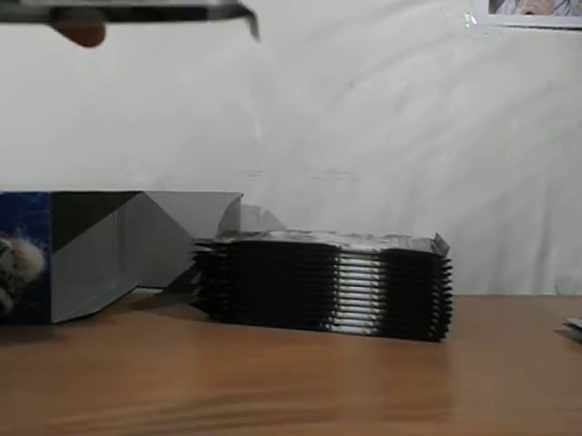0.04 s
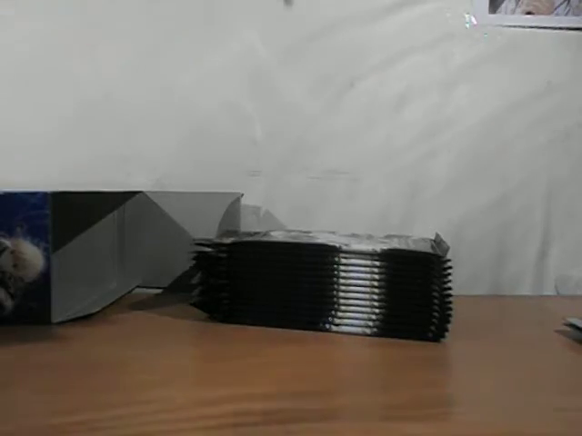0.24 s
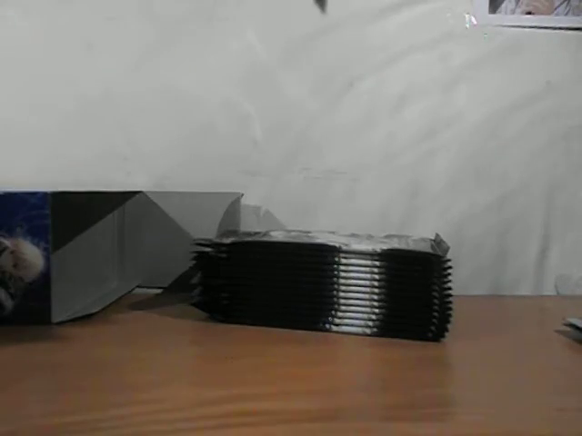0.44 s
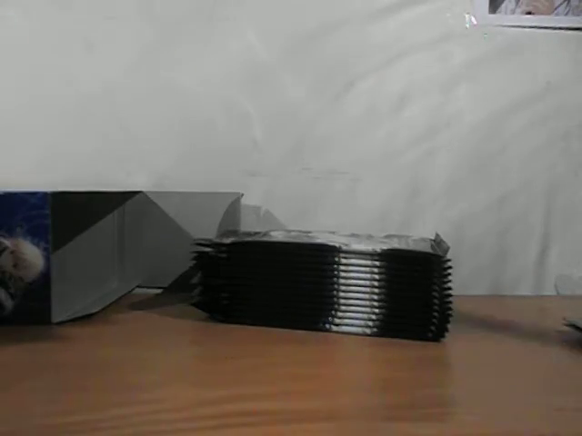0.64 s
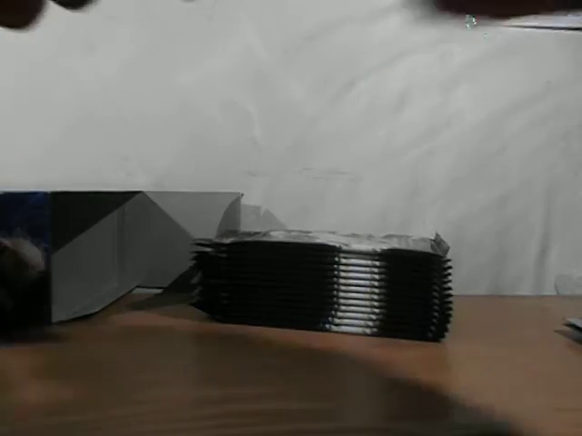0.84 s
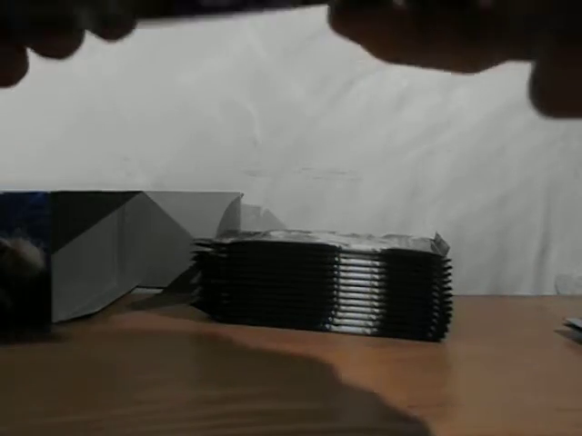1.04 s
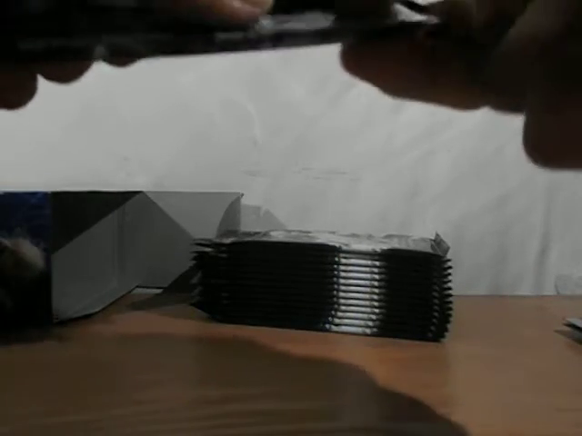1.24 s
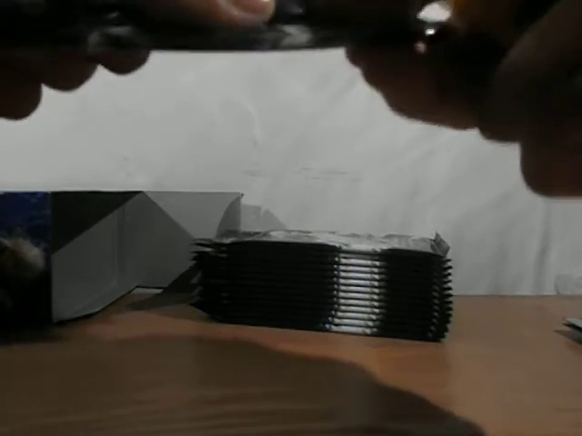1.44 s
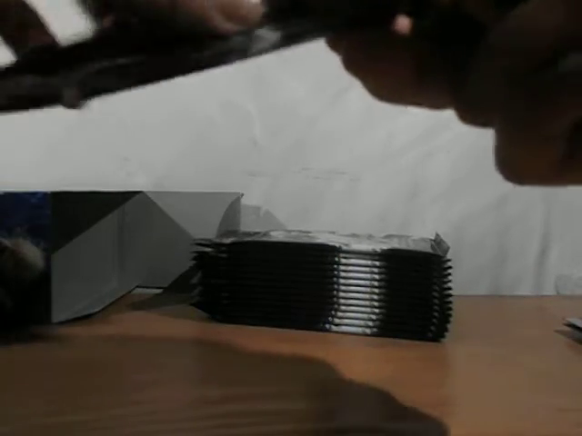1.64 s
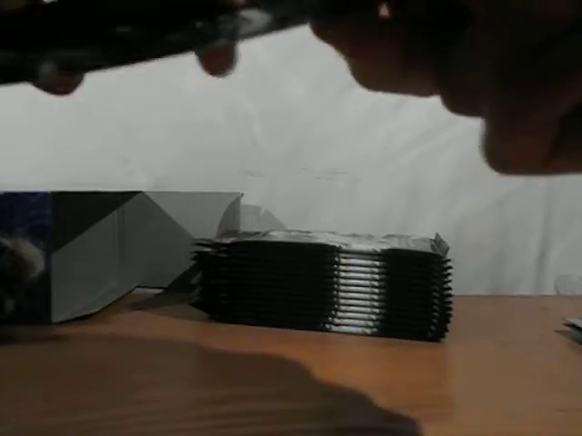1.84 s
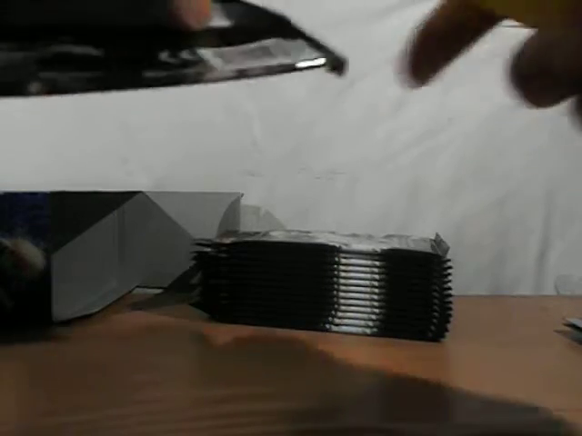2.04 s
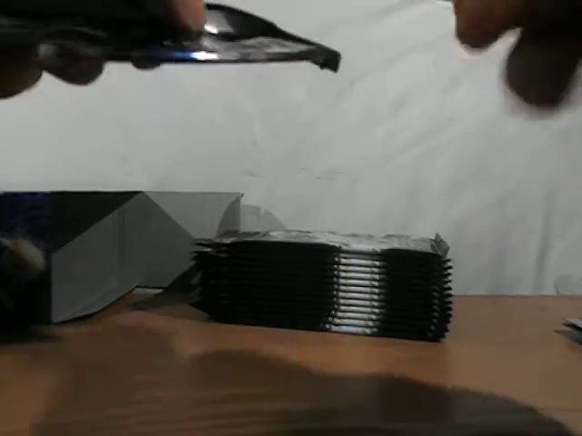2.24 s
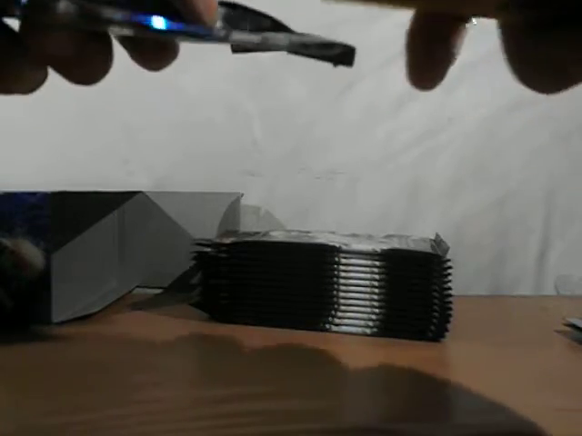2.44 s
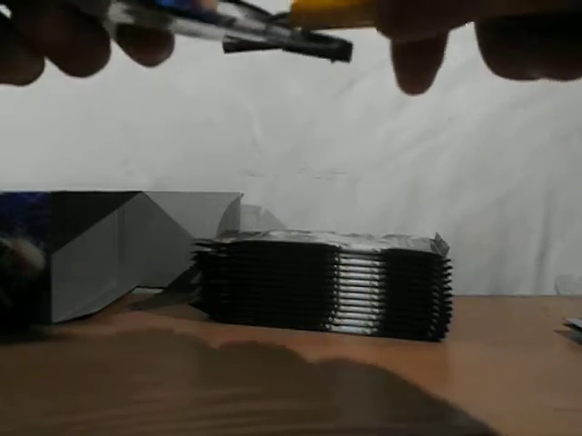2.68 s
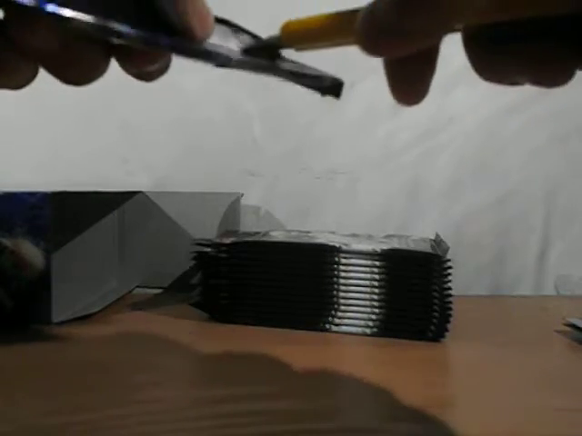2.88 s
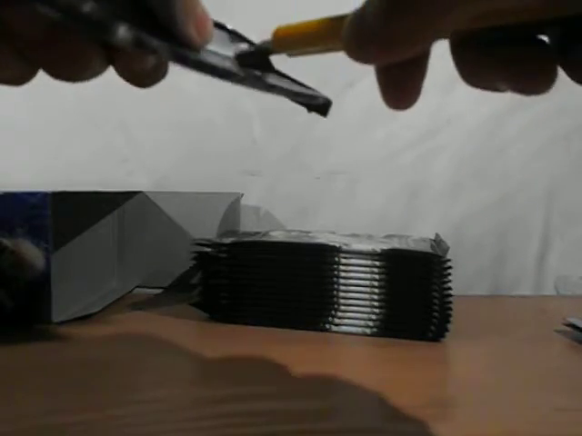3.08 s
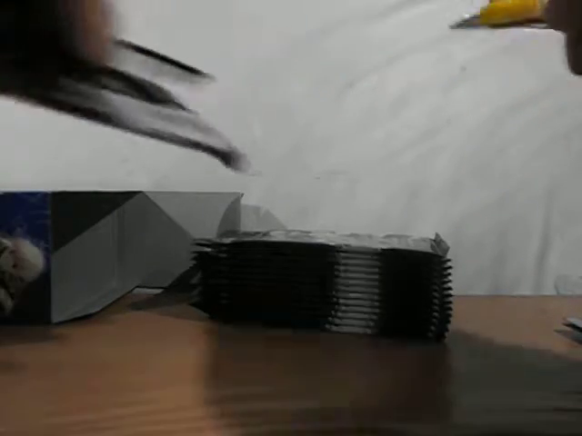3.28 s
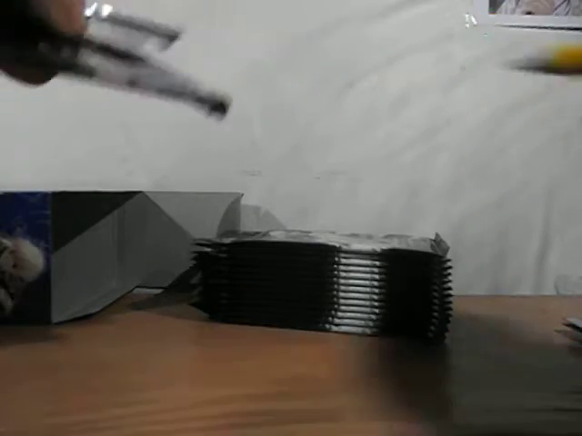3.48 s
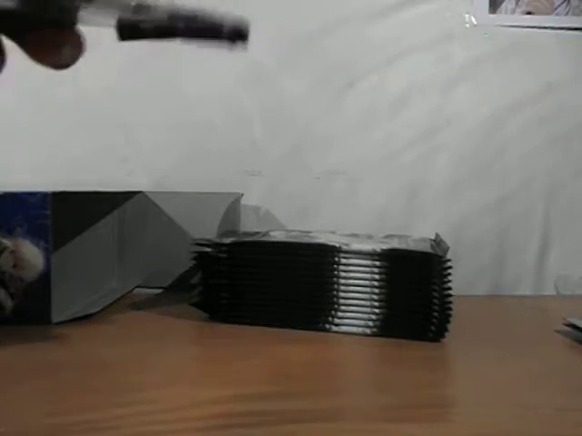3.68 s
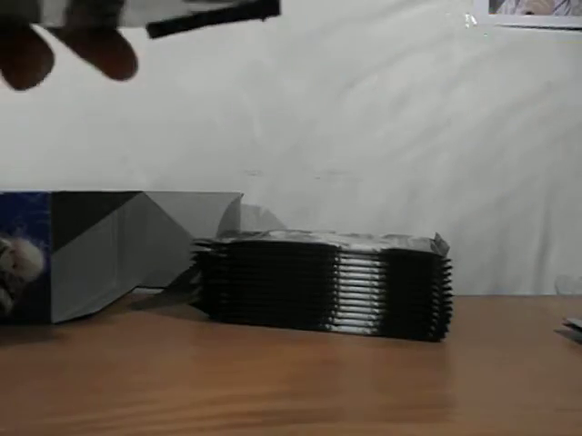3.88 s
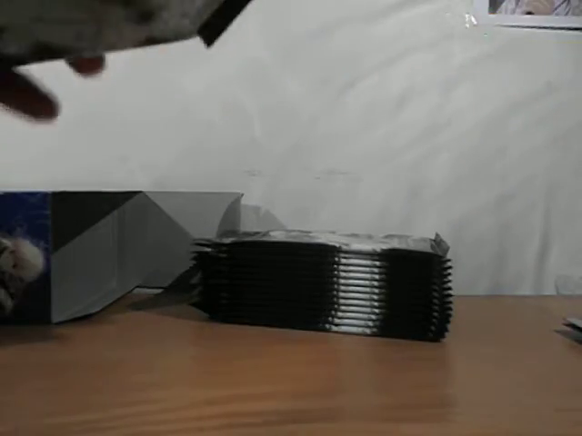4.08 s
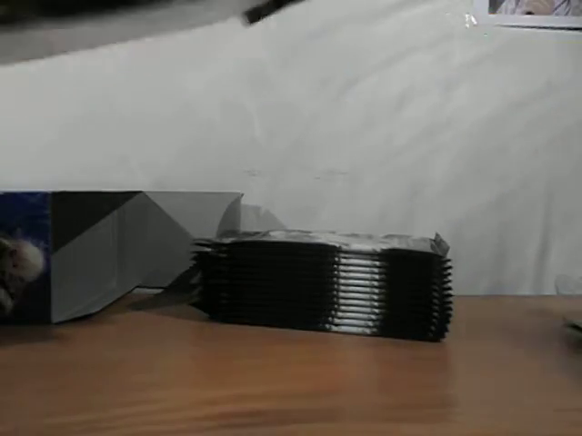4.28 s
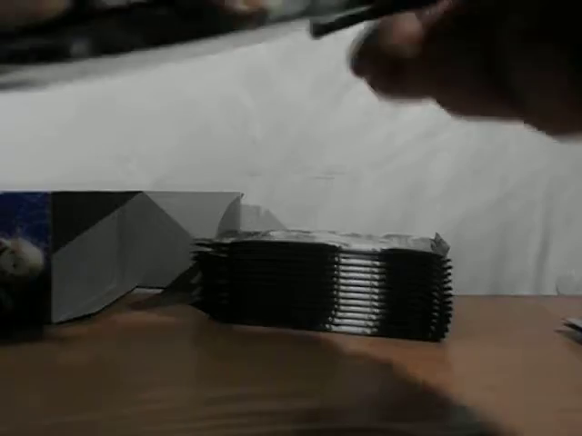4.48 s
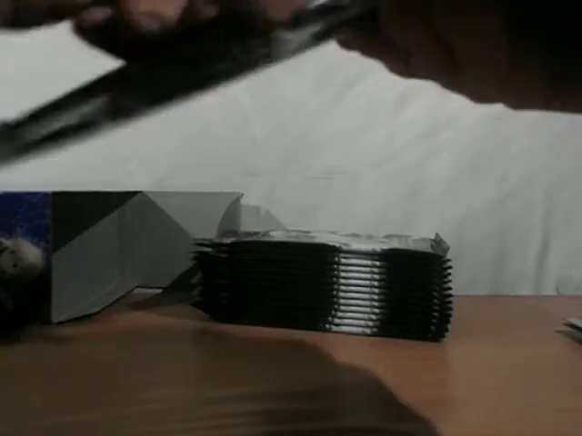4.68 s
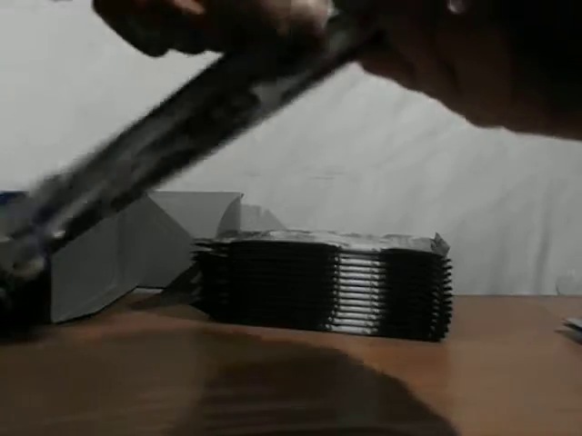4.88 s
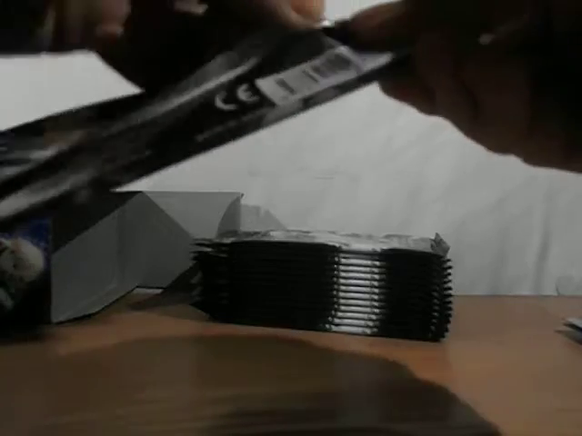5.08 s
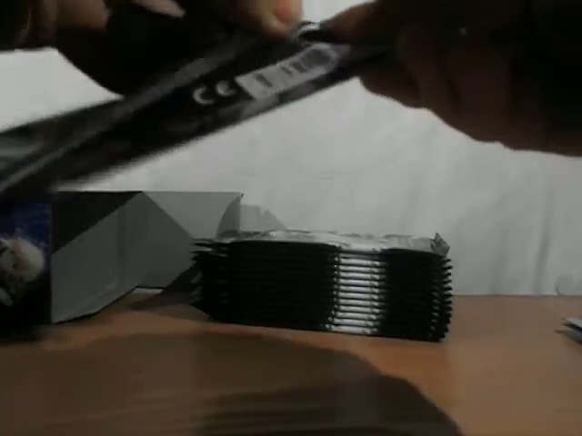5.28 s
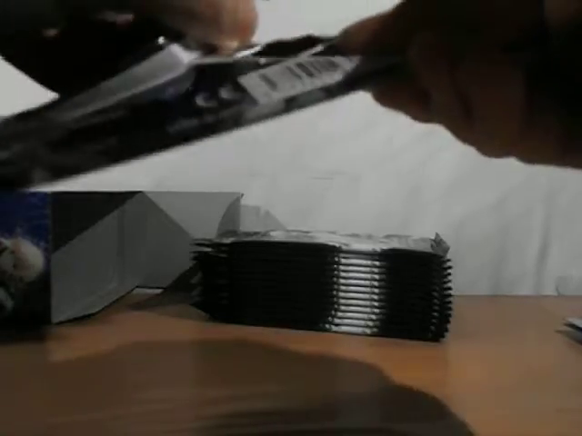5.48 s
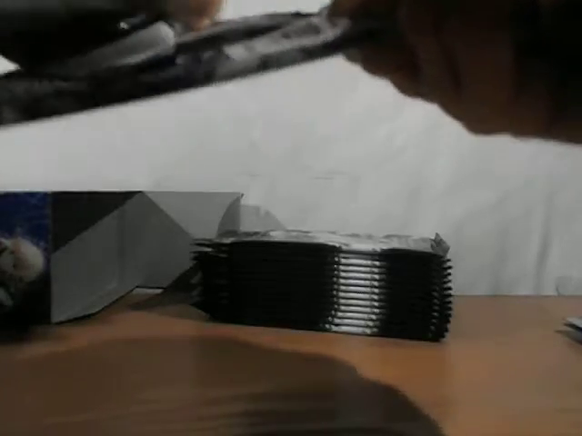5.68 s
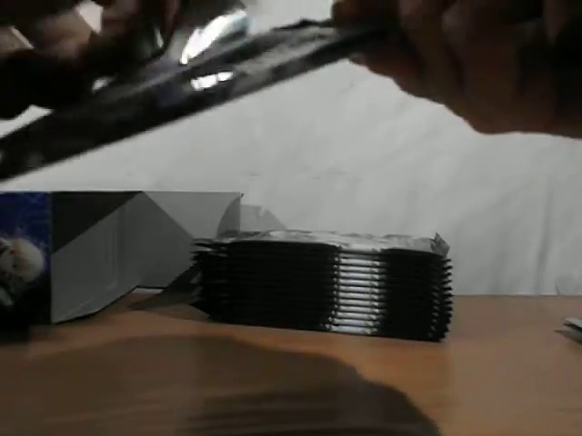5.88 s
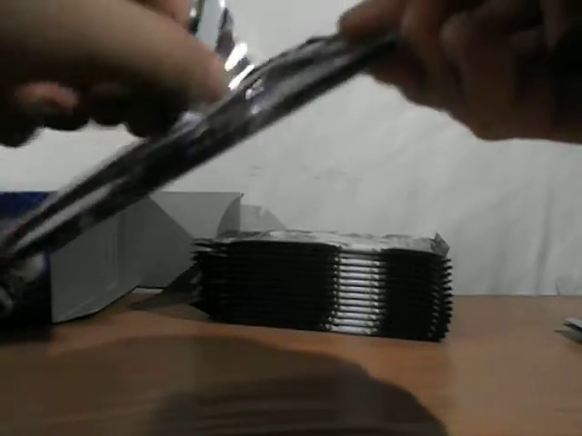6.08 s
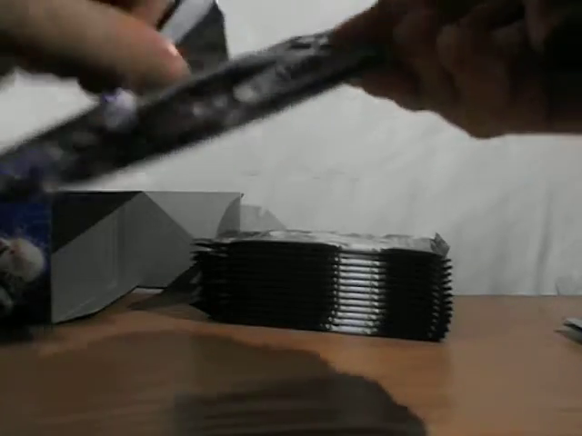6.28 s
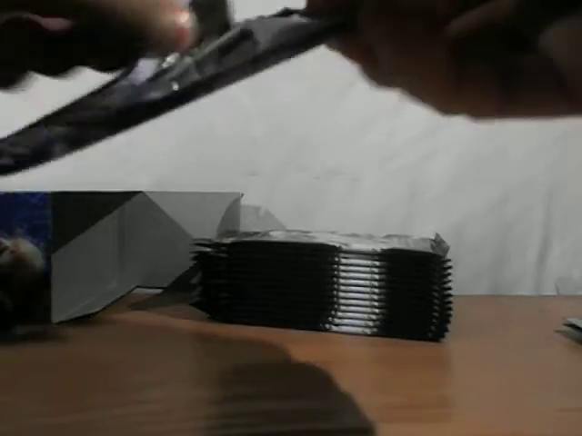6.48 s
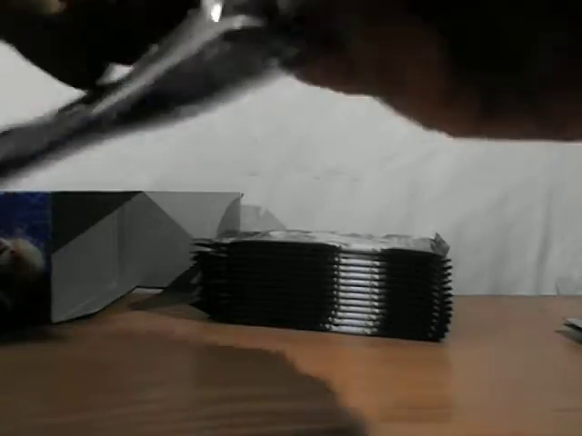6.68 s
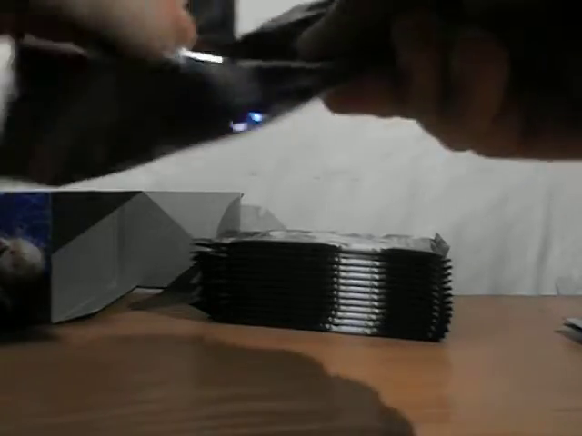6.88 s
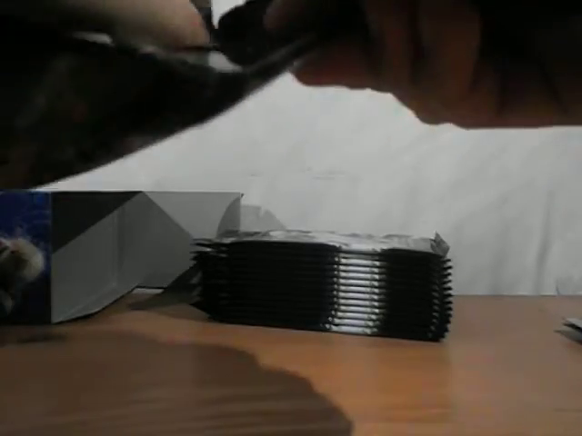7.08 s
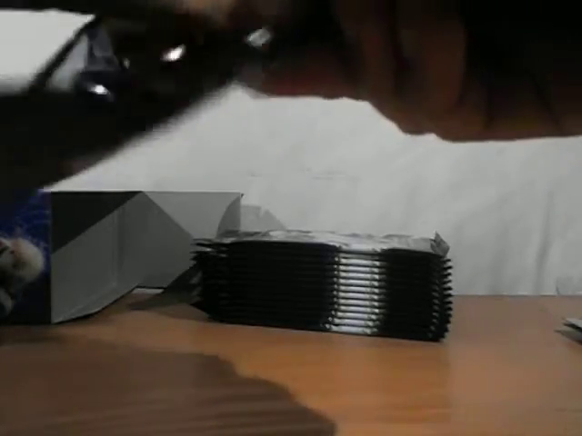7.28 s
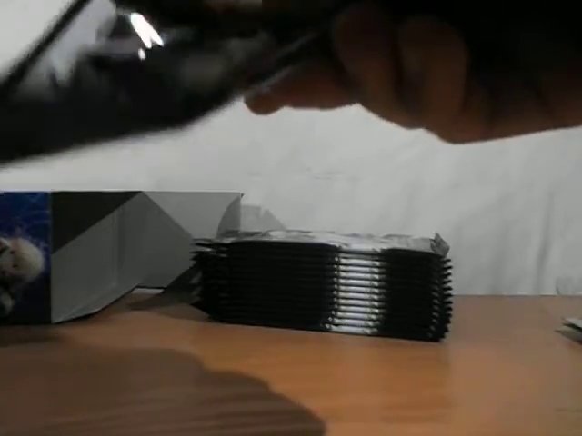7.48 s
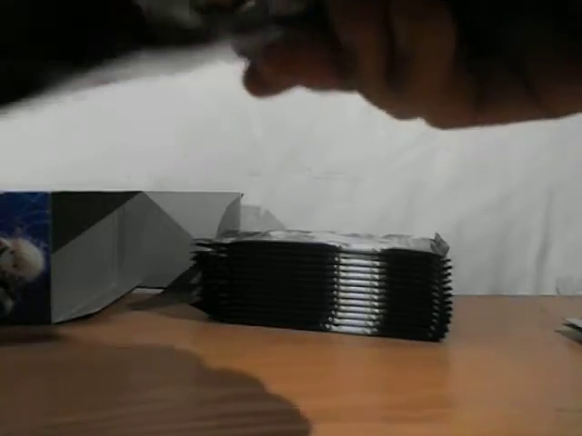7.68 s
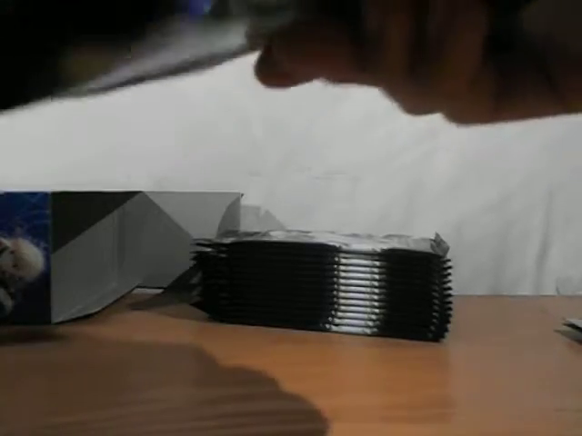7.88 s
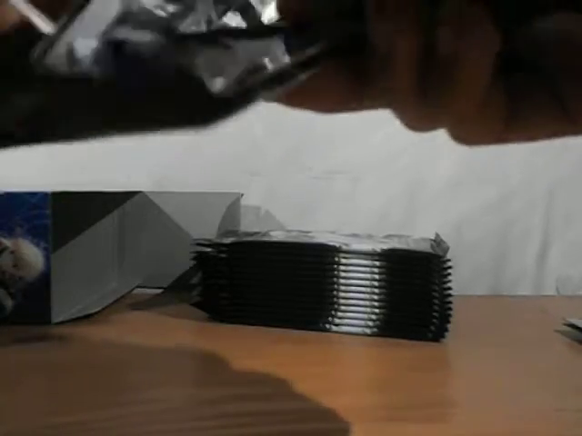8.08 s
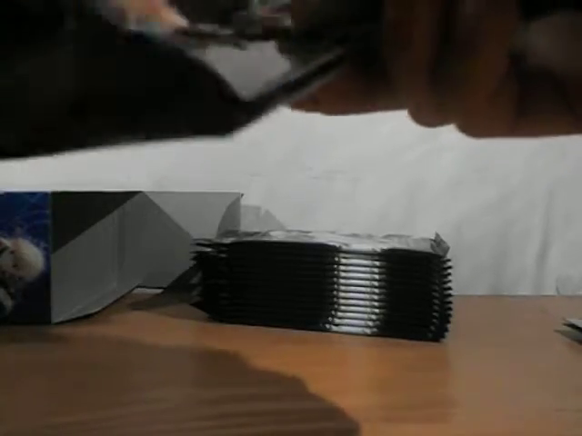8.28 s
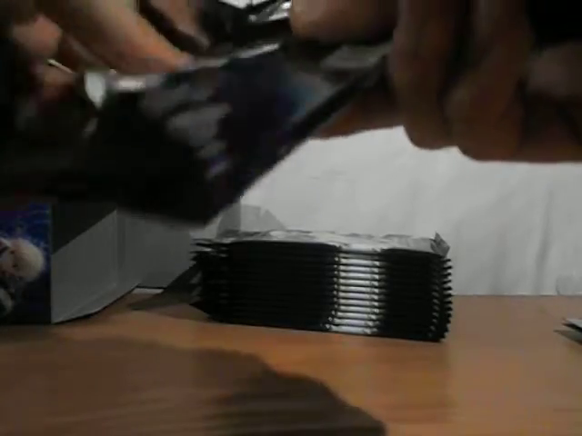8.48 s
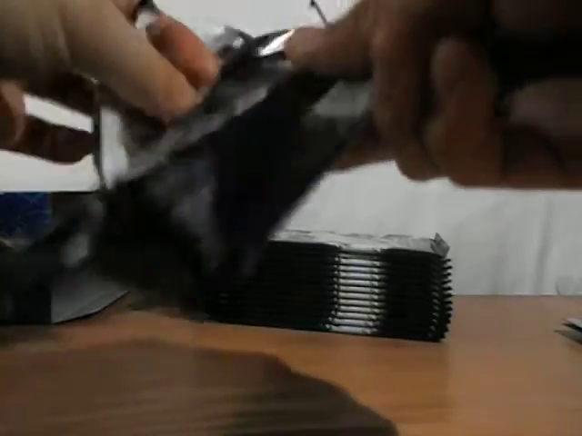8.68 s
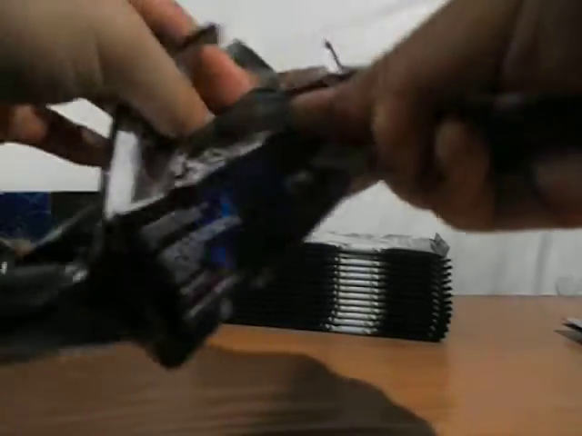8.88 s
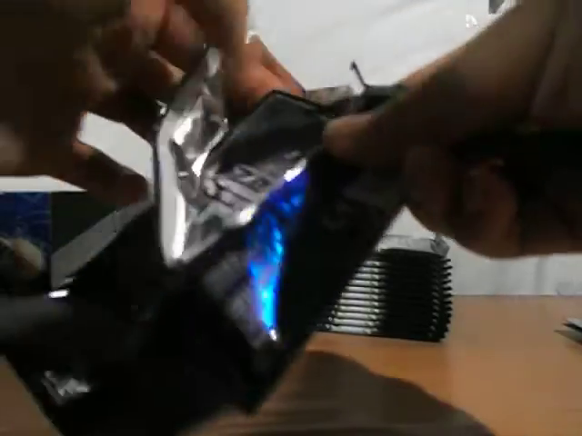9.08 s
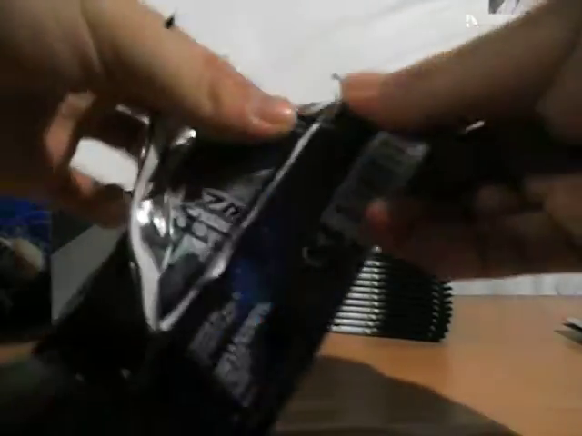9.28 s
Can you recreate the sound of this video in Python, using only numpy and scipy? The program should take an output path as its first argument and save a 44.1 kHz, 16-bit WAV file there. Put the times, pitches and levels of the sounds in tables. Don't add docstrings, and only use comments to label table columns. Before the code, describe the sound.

Close, sharp foil crinkling grows from sparse ticks to dense tearing snaps, with soft table knocks and a low room hum underneath.

```python
import sys
import numpy as np
from scipy import signal
from scipy.fft import rfft, irfft, next_fast_len
from scipy.io import wavfile
from scipy.ndimage import uniform_filter1d

SR = 44100
rng = np.random.default_rng(int(sys.argv[2]) if len(sys.argv) > 2 else 0)


def gain_from_db(level_db):
    decades = np.asarray(level_db, float) / 20
    return 10 ** decades


def output_pcm(signal):
    pcm = np.clip(np.atleast_2d(signal).T, -1, 1) * 32767
    wavfile.write(sys.argv[1], SR, np.round(pcm).astype(np.int16))


N = 411453


def evened(x):
    return x / np.sqrt(np.mean(x ** 2) + 1e-20)


def coloured(x, points):
    points_hz, points_db = np.transpose(points)
    size = next_fast_len(len(x), True)
    hz = np.fft.rfftfreq(size, 1 / SR)
    db = np.interp(np.log(hz + 1), np.log(points_hz + 1), points_db)
    return irfft(rfft(x, size) * gain_from_db(db), size)[:len(x)]


def add(mix, start_s, sound):
    part = mix[round(start_s * SR):][:len(sound)]
    part += sound[:len(part)]


def decay(t, t60_s):
    return gain_from_db(-60 * t / t60_s)


def ring(t, hz, rise_s, t60_s):
    shape = (1 - np.exp(-t / rise_s)) * decay(t, t60_s)
    return shape / shape.max() * np.sin(2 * np.pi * hz * t)


# (frequency [Hz], density [dB per Hz])
HUSH = [(18, 5), (42, 4), (65, -9), (200, -19.5), (360, -31), (700, -28.5), (2000, -29), (5300, -31)]


def hush(noise_db=-40, hum_hz=119, hum_db=-58):
    t = np.arange(N) / SR
    swell_db = 1.5 * evened(uniform_filter1d(rng.standard_normal(N), 6000))
    noise = evened(coloured(rng.standard_normal(N), HUSH)) * gain_from_db(swell_db)
    return gain_from_db(noise_db) * noise + gain_from_db(hum_db) * np.sin(2 * np.pi * hum_hz * t)


# (time [s], peak [dB], pitch [Hz], t60 [s])
SWAYS = [
    (3.153, -23.5, 10.56, 1),
    (7.772, -23.5, 10.7, 0.61),
]


def sways():
    out, t = np.zeros(N), np.arange(SR // 2) / SR
    for s, db, hz, t60_s in SWAYS:
        add(out, s, gain_from_db(db) * ring(t, hz, .0059, t60_s))
    return out


# (time [s], peak [dB], pitch [Hz], t60 [s])
KNOCKS = [(0.0012, -41, 164, 0.11), (4.24, -38.5, 150, 0.1), (3.154, -33.5, 187, 0.16),
          (6.153, -30, 180, 0.14), (4.795, -38.5, 170, 0.09), (4.147, -17, 145, 0.17),
          (4.525, -27.5, 125, 0.17), (4.559, -20.5, 140, 0.14), (4.578, -27, 132, 0.22),
          (4.54, -32, 157, 0.19), (5.277, -28, 63.1, 0.26), (6.1, -27, 89.6, 0.26),
          (6.627, -22.5, 67, 0.14), (9.163, -30.5, 67.4, 0.57)]


def knocks():
    out, t = np.zeros(N), np.arange(SR // 2) / SR
    buzz_colour = [(90, -9.0), (250, -4.5), (600, -11.0), (1500, -34.0)]
    for s, db, hz, t60_s in KNOCKS:
        low = ring(t, hz, .002, t60_s)
        overtone = ring(t, hz * 1.582, .0065, t60_s * .64)
        rough = evened(coloured(rng.standard_normal(len(t)), buzz_colour))
        buzz = rough * ring(t, hz / 4, .0042, t60_s)
        add(out, s, gain_from_db(db - 3) * (low + .6 * overtone + .38 * buzz))
    return out


def facets(x, patchy_db=3.0):
    z = signal.stft(x, nperseg=256)[2]
    patches = uniform_filter1d(rng.standard_normal(z.shape), size=5, axis=0)
    patches = uniform_filter1d(patches, size=14, axis=1)
    return signal.istft(z * gain_from_db(patchy_db * evened(patches) - 1), nperseg=256)[1][:N]


# (frequency [Hz], level [dB])
FOIL = [(300, -15), (1800, -14), (2600, -5), (3500, -3), (4300, -2.5), (5200, -10)]
# (frequency [Hz], level [dB])
BODY = [(150, 3), (370, -11), (600, -4.5), (1100, 1.5), (1800, -2.5), (3000, -19)]
# (time [s], level [dB])
STIR = [(0, -48), (.8, -57), (1.7, -43.5), (2.5, -54), (3.45, -46.5), (3.7, -52), (4.4, -50), (4.85, -44),
        (5.4, -47.5), (6.3, -47.5), (6.55, -36), (6.95, -41), (7.3, -40.5), (7.6, -46.5), (7.95, -39.5),
        (8.76, -41), (8.86, -42.5), (9.33, -38.5)]
# (start [s], end [s], level [dB])
CRUMPLES = [(0.862, 0.911, -35), (1.241, 1.298, -38.5), (1.445, 1.64, -37.5), (1.862, 1.924, -39),
            (2.8, 2.913, -38), (3.038, 3.044, -40), (3.14, 3.189, -27), (3.454, 3.512, -40),
            (3.502, 3.55, -30.5), (4.129, 4.187, -27), (4.617, 4.685, -33.5), (5.252, 5.365, -29.5),
            (5.745, 5.927, -41), (5.998, 6.097, -35), (6.121, 6.185, -27), (6.481, 6.527, -33.5),
            (6.548, 6.661, -32.5), (6.664, 6.749, -30), (6.731, 6.777, -23.5), (6.982, 7.14, -27),
            (7.187, 7.28, -34), (7.319, 7.422, -40), (7.52, 7.603, -29.5), (7.72, 7.785, -21),
            (8.118, 8.148, -36.5), (8.238, 8.298, -32), (8.365, 8.407, -44), (8.516, 8.623, -49),
            (8.936, 9.04, -33), (9.158, 9.188, -23),
            (1.63, 1.668, -29),
]


def rustle(per_s=550, spread_db=5.5, body_db=-9, wake_db=-22, wake_t60_s=.036):
    t = np.arange(N) / SR
    level = gain_from_db(np.interp(t, *np.transpose(STIR)))
    firm = (level / gain_from_db(-38.5)) ** .4
    for start, end, db in CRUMPLES:
        length = max(round((end - start) * SR), 9)
        add(level, start, gain_from_db(db) * signal.windows.tukey(length, .6))
    wake = gain_from_db(wake_db) * decay(t[:SR // 10], wake_t60_s)
    for s, db, *rest in SNAPS + small_creases():
        add(level, s, gain_from_db(db) * wake)

    clicks = gain_from_db(spread_db * np.minimum(rng.exponential(1, N), 4)) * (rng.random(N) < per_s / SR)
    grains = signal.oaconvolve(clicks, decay(t[:600], .0076))[:N]
    grains /= np.sqrt(uniform_filter1d(grains ** 2, 1500) + .5)
    grains = (evened(grains) + .3) ** np.clip(1 - level / gain_from_db(-15), .3, 1)
    grains = level * grains * rng.standard_normal(N)

    unit = rng.standard_normal(N)
    foil = coloured(grains, FOIL) / np.std(coloured(unit, FOIL))
    body = coloured(firm * grains, BODY) / np.std(coloured(unit, BODY))
    return facets(foil + gain_from_db(body_db) * body)


def snap(db, hz, body_db, chance):
    t = np.arange(1024) / SR
    second_hz = hz * 1.25 ** np.clip(chance[0, 0], -1, 1)
    crack = ring(t, hz, .0007, .003) + .8 * ring(t, second_hz, .0002, .0022)
    crack += .36 * ring(t, 4810, .00022, .0025)
    rattle = evened(coloured(chance[1], FOIL)) * (1 - np.exp(-t / .0015)) * decay(t, .016)
    thud = evened(coloured(chance[2], BODY)) * (1 - np.exp(-t / .0004)) * decay(t, .014)
    sound = crack + gain_from_db(-4.5) * rattle + gain_from_db(body_db + 1.5) * thud
    return gain_from_db(db) * sound / abs(sound).max()


# (start [s], end [s], first rate [slips/s], last rate [slips/s], peak [dB], ring pitch [Hz])
PEELS = [
    (6.776, 6.798, 400, 180, -9, 3340),
    (6.843, 6.882, 190, 480, -2, 3190),
]


def peels():
    out = np.zeros(N)
    for start, end, first, last, db, hz in PEELS:
        t = np.arange(start, end, 1 / SR)
        slip_count = np.cumsum(np.linspace(first, last, len(t))) / SR + 1.1
        for i in np.flatnonzero(np.diff(np.floor(slip_count))):
            chance = rng.standard_normal((3, 1024))
            add(out, t[i], snap(min(db + chance[0, 1], -6), hz, -19, chance))
    return out


# (time [s], peak [dB], ring pitch [Hz])
TICKS = [(0.0942, -17.5, 3700), (0.196, -15.5, 3250), (0.2884, -22.5, 4000), (0.311, -24.5, 3220),
         (1.0559, -14.5, 2700), (1.0805, -24.5, 1160.0), (1.2533, -19, 3230), (1.3255, -12, 2100),
         (1.41, -23, 4080), (1.4242, -21, 3570.0), (1.5072, -14, 3490.0), (1.595, -13.5, 2540.0),
         (1.6057, -13.5, 3470), (1.6184, -19.5, 950.0), (1.6443, -21, 3250), (1.6784, -14.0, 5060),
         (1.7197, -20.5, 3240), (1.7273, -19, 4230), (1.774, -18.5, 3400), (1.8237, -14, 4120),
         (1.8852, -19, 3360.0), (1.8982, -25, 3570.0), (1.9038, -31, 3260), (1.9113, -25, 3470),
         (2.0028, -14, 4770), (2.0293, -13.5, 3900), (2.0402, -18, 3380), (2.1169, -13.5, 3850),
         (2.1329, -25, 4090.0), (2.1434, -23, 3100), (2.395, -15.5, 3530), (2.4254, -20, 3840),
         (2.7518, -24.0, 3700), (2.7814, -20.5, 3960.0), (2.837, -20, 2450.0), (2.8658, -13, 2720),
              (2.8975, -11, 5150), (2.9008, -18.0, 3700.0), (2.9444, -11, 5100), (3.018, -13.5, 2460),
              (3.1224, -12.5, 4700), (3.14, -16, 4180.0), (3.2162, -14, 3500), (3.3017, -19.5, 3470),
              (3.3533, -10, 4240), (3.3905, -20.5, 2300), (3.5259, -14, 3250), (3.5294, -17, 3530.0),
              (3.7305, -17.0, 4070), (3.7794, -20, 4130.0), (3.8488, -23.5, 3660), (4.0222, -17, 4000),
              (4.1142, -22.5, 3650), (4.1204, -27, 2930.0), (4.1699, -17.0, 4740.0), (4.3512, -12, 3180),
              (4.479, -21, 4000), (4.5319, -13, 4310.0), (4.621, -15.0, 3340), (4.6602, -14.0, 3190.0),
              (4.6675, -19, 3080), (4.6903, -20, 3490.0), (4.7312, -18.5, 3340), (4.7962, -15, 4010.0),
              (4.8519, -16, 3530.0), (4.8912, -18.5, 3490.0), (5.1494, -16, 4160), (5.158, -21, 3260),
              (5.2526, -18, 3730), (5.2682, -18, 3230.0), (5.306, -9, 4600), (5.3214, -13, 3300),
              (5.3515, -19, 4520.0), (5.369, -24, 3700.0), (5.4711, -21.5, 2960), (5.5717, -22.5, 2800.0),
              (5.6423, -15.5, 3500), (5.6709, -18.5, 3620), (5.715, -25, 3300), (5.745, -21, 3490.0),
              (5.7777, -20, 3270.0), (5.7944, -13, 3100), (5.8516, -25, 3450.0), (5.8634, -27, 4440),
              (6.0256, -20.0, 3600), (6.0534, -21, 1380.0), (6.0712, -17.0, 3750.0), (6.0781, -20, 3630),
              (6.1387, -13, 3360), (6.1887, -27, 3190.0), (6.2594, -18, 3460), (6.2817, -19, 3960),
         (6.3514, -23.0, 3920.0), (6.3647, -17, 3960.0), (6.397, -14.5, 4820.0), (6.4252, -19, 1550.0),
              (6.437, -14.0, 5040.0), (6.4491, -14, 4350.0), (6.4909, -13, 3360.0), (6.4943, -15, 4260.0),
              (6.5042, -19, 2670.0), (6.548, -18, 3880.0), (6.567, -15, 3360.0), (6.6162, -15, 2930.0),
              (6.623, -14, 2930.0), (6.6445, -10, 3400.0), (6.6596, -15, 4130.0), (6.6672, -18, 1210.0),
              (6.6753, -15.0, 3880.0), (6.6838, -12, 3060.0), (6.7074, -19, 2110.0), (6.7264, -18, 3880.0),
              (6.7585, -24, 3320.0), (7.002, -19.5, 2840.0), (7.0098, -19, 1080.0), (7.0214, -25, 2930.0),
              (7.049, -20, 3530.0), (7.0716, -13, 2710.0), (7.0891, -22, 3360.0), (7.0972, -15, 3140.0),
              (7.1131, -27, 4440.0), (7.176, -21, 860.0), (7.215, -23, 3140.0), (7.2223, -15, 3700.0),
              (7.237, -13, 990.0), (7.2492, -18, 3060.0), (7.3186, -17.5, 2930.0), (7.3273, -18, 2930.0),
              (7.341, -19, 2930.0), (7.3937, -19, 2760.0), (7.4494, -24, 1460.0), (7.4561, -17, 3790.0),
              (7.4593, -24, 3140.0), (7.4778, -17, 3660.0), (7.6085, -20.5, 2970.0),
         (7.7155, -10, 3060.0), (7.801, -14, 4310.0), (7.8588, -15, 3660.0), (7.9065, -16, 1290.0),
                (7.9274, -24, 2840.0), (7.9468, -25, 3060.0), (8.0492, -14, 2760.0), (8.063, -17, 4220.0),
                (8.0938, -27, 3750.0), (8.1436, -26.5, 3140.0), (8.1693, -19, 3620.0),
                (8.185, -17.5, 2330.0), (8.2203, -17, 4010.0), (8.2304, -25, 4740.0), (8.25, -13.5, 1030.0),
                (8.289, -30, 2930.0), (8.5219, -19, 3790.0), (8.5326, -18.0, 2710.0), (8.5427, -15, 3660.0),
                (8.5665, -32, 3010.0), (8.593, -19, 3660.0), (8.6228, -23, 3100.0), (8.632, -12, 3620.0),
                (8.6524, -18.5, 3400.0), (8.6692, -21.5, 3570.0), (8.6953, -23.5, 1120.0),
                (8.7475, -13.5, 3920.0), (8.7494, -18, 2890.0), (8.7803, -14, 2970.0), (8.796, -17, 3490.0),
                (8.8964, -17, 1210.0), (8.957, -14, 1380.0), (9.139, -20.0, 3750.0), (9.1916, -6.5, 3230.0),
                (9.1953, -19, 3320.0)]
# (time [s], peak [dB])
FAINT = [(0.0142, -22), (0.0284, -33), (0.3765, -21.5), (0.4214, -28), (0.6619, -24), (0.6817, -30),
         (0.6916, -18.5), (0.7287, -20.5), (1.289, -27), (1.3887, -27), (1.477, -22), (2.359, -21.5),
         (2.576, -21.5), (2.617, -26.5)]


def small_creases(faint_hz=4280):
    faint = [(s, db, faint_hz) for s, db in FAINT]
    return TICKS + faint


# (time [s], peak [dB], ring pitch
# [Hz], low body against ring [dB])
CREASES = [(0.9704, -11.5, 2150.0, -9), (1.0375, -10.5, 3630, -24), (1.1938, -10.0, 3140, -8),
           (1.5162, -9.5, 3880.0, -12), (1.5223, -4, 3520, -17), (1.5358, -6, 3270.0, -18),
           (1.5394, -4.5, 2460, -14), (1.5571, -8, 5030, -33), (1.6481, -10.5, 2840, -16),
           (1.6509, -6.5, 5140, -12), (1.8273, -10.5, 3580, -9.5), (1.8412, -14, 3480, -22.0),
           (1.8951, -5, 3750.0, -23.0), (1.9625, -6, 3450, -32), (2.1645, -7, 3400, -16.5),
           (2.2032, -7.5, 4500, -22),
           (2.8471, -6, 3970, -38), (2.8906, -11, 3570, -35), (2.9054, -15, 3480, -24),
            (3.0263, -10, 3870, -12), (3.1616, -11, 3370, -13), (3.4055, -9, 4440.0, -32),
            (3.5492, -11.5, 3500, -28), (3.7221, -7, 3730, -48), (3.9154, -12.5, 3930, -6),
            (4.157, 4, 3830.0, -16), (4.1598, -14, 3660.0, -11), (4.503, -3.5, 4260.0, -27.5),
            (4.5086, -10, 4000, 1), (4.5208, -6.5, 3190.0, -33), (4.528, -7, 3540, -38),
            (4.5462, -8, 3790.0, -32.0), (4.6169, -8, 4740.0, -18), (4.627, -14.5, 3140.0, -26),
            (4.6302, -8, 3270.0, -14.5), (4.6488, -8.5, 3600, -33.5), (4.6773, -9.5, 3360, -29),
           (4.8107, -11.5, 3330, -24.0), (4.8635, -9, 3430, -30), (4.9045, -7, 3658, -35),
          (4.9186, -11.5, 2900, -25.0), (4.9247, -9.5, 3440, -29), (4.9432, -7.5, 2130, -16),
          (4.9474, -6, 3250, -17), (4.96, -4.5, 4300, -25), (4.9702, 1.5, 3500, -14),
          (5.0277, -2.5, 4220, -5), (5.0379, -5.5, 3760, -8), (5.056, -9, 4360, -18.5),
          (5.0809, -4, 3750, -39), (5.1002, -5.5, 4080, -14), (5.28, -12.5, 3380, -17),
          (5.2903, -19, 3230.0, -20), (5.2952, -17, 3100.0, -20), (5.3004, -5.5, 3600, -15),
          (5.3145, -6.5, 3530, -29), (5.7554, -5, 3470, -12), (5.7902, -6.5, 4230, -9.5),
          (6.0363, -10.5, 3760, -17), (6.1446, -1, 5020, -18), (6.1542, -6, 3780, -16),
          (6.1583, -6, 3490.0, -5), (6.1832, -6.5, 3400, -29.0),
           (6.4218, -10, 4090.0, -21), (6.4984, -16, 3490.0, -23), (6.5249, -4.5, 3790.0, -27),
           (6.6327, -12.5, 3490.0, -24), (6.6808, -8.0, 3320.0, -11.5), (6.7384, -5, 4700, -21),
           (6.7453, -8, 4090.0, -28), (6.7521, -2.5, 3020, -34.5), (6.7744, -16, 3490.0, -23),
           (6.8355, -9.5, 3100, -32.0), (6.8948, 0, 3360.0, -28), (6.9062, -8, 3130, -41),
           (6.922, -11.5, 3090, -4), (7.054, -6.5, 3230.0, -21), (7.0636, -6.5, 2370.0, -3.5),
           (7.0845, -8.5, 4700, -5), (7.195, -7.0, 3550, -4), (7.2587, 1, 3380, -22),
           (7.27, -4.5, 4080, -7), (7.282, -12.5, 4020, -31), (7.356, -6, 3010.0, 5),
           (7.3607, -12, 2850, -20.0), (7.3685, -9.5, 3190.0, -16), (7.5067, -2.5, 2000, -16.0),
           (7.5137, -2, 3490.0, -15.0), (7.5208, -14.5, 3550, -17), (7.539, -9, 2890.0, -7),
           (7.5417, -6.5, 3800, -29), (7.5511, -7, 4220, -24.5), (7.5735, -16, 2930.0, -18),
           (7.583, -1.5, 3000, -14), (7.59, -9, 2990, -26.5),
           (7.7222, -12, 3720, -27.0), (7.7298, -7, 2960, -21), (7.7321, -2.5, 4770, -20.0),
             (7.7346, 2, 2950, -9), (7.7394, 8.5, 3200, -17.0), (7.7605, -5.5, 4180.0, -17),
             (7.7784, -10.5, 2840.0, -7), (7.807, -9.5, 3320.0, -13), (7.8771, -6.5, 3000, -11),
             (7.9644, -6, 2370.0, -26), (7.989, -6, 3280, -17), (8.0192, -7.5, 4100, -14),
             (8.0352, -6.5, 2900, -20), (8.2533, -10.5, 2620, -10), (8.2682, -8.5, 2610, -9),
             (8.3024, -12.5, 2630.0, -26.0), (8.3085, -12, 2450.0, -8), (8.3133, -9.0, 3790.0, -27),
             (8.3447, -5.5, 3270.0, -15), (8.3772, -1, 3660, -14), (8.3993, -5, 3220, -23.0),
             (8.4592, -7.5, 3790.0, -41.0), (8.4686, -19, 3190.0, -33.5), (8.474, -9.5, 4200, -39),
             (8.4787, -19, 3940, -35.0), (8.5013, -5, 4040, -31), (8.505, -18, 3950, -36),
             (8.5875, -8.5, 2930.0, -16), (8.6013, -6.5, 3230.0, -1.5), (8.6056, -7, 3600, -8),
             (8.8882, -4.5, 3530, -18.0), (8.9596, -12.5, 4140, -13), (9.001, -17.5, 3070, -7),
             (9.102, -12.5, 2450, -1), (9.1246, -6.5, 3640, -11.5), (9.1513, -17, 3100.0, -1),
             (9.1631, -5, 3860, -17), (9.1723, -4, 3600, -15), (9.1758, -13, 3060.0, -19.0),
             (9.1874, -12, 3640, -27), (9.2064, -8, 3830.0, -19), (9.2434, -8.5, 3600, -22),
             (9.2481, -5, 3800, -9.5), (9.254, -8.5, 3750, -7.5), (9.3173, -9.5, 3860, 1)]
SNAPS = CREASES
# (time [s], peak [dB], ring pitch [Hz], body [dB])
CRACKS = [(1.5697, -1.4, 3320.0, -22), (2.9185, 0.2, 3400.0, -21), (2.9558, -1.6, 3320.0, -26),
          (2.9755, 0.3, 3790.0, -30), (3.1545, 1.5, 4220.0, -13), (6.6966, 2.0, 4260.0, -20),
          (7.0191, -0.6, 2890.0, -20), (7.2882, 0.8, 4130.0, -22), (7.4014, -2.0, 3920.0, -24),
          (7.4382, -0.7, 3660.0, -18), (7.5023, -2.1, 4520.0, -14), (7.544, -1.3, 3660.0, -24),
          (7.5575, 0.3, 4130.0, -16), (7.5624, -1.2, 4050.0, -19), (7.5921, -1.2, 3660.0, -11),
          (7.69, -1.0, 2710.0, -6), (7.7506, -2.0, 2760.0, -5), (7.7587, -1.6, 2840.0, -15),
          (7.7672, 0.8, 2930.0, -6), (8.2788, -0.9, 4050.0, -10), (8.282, -0.7, 3960.0, -8),
          (8.4173, -0.8, 2450.0, -8), (8.5627, -2.4, 3620.0, -26), (9.3288, -3.2, 3700.0, -15)]


def snaps(lead_s=.0003, crack_delay_s=.0005):
    out = np.zeros(N)
    rows = [(s + crack_delay_s, *rest) for s, *rest in CRACKS]
    rows += [(s, min(db, -3.8), *rest) for s, db, *rest in SNAPS]
    for s, db, hz, body_db in rows:
        add(out, s - lead_s, snap(db, hz, body_db, rng.standard_normal((3, 1024))))
    for s, db, hz in small_creases():
        chance = rng.standard_normal((3, 1024))
        add(out, s - lead_s, snap(min(db, -8), hz, -21 + 3 * chance[0, 2], chance))
    return out


def room(x, t60_s):
    t = np.arange(SR // 3) / SR
    tail = rng.standard_normal(len(t)) * decay(t, t60_s) * (t > .002)
    return signal.oaconvolve(x, tail / np.linalg.norm(tail))[:N]


def scene():
    low_dip = [(40, -5.0), (180, -3.0), (360, -10.5), (560, 0)]
    near = coloured(snaps() + peels() + rustle(), low_dip)
    wet = gain_from_db(-22) * room(near, t60_s=.12)
    return (near + wet + knocks() + sways() + hush())[None]


def low_pass(x):
    return signal.sosfilt(signal.butter(12, 16600, fs=SR, output="sos"), x)


def record(dry, edge_hz=5550, limit=.71, offset=-.0028):
    band = signal.firwin(121, edge_hz, window=("kaiser", 10), fs=SR)
    narrow = signal.oaconvolve(dry, band[None], "same")
    return low_pass(np.clip(narrow + offset, -limit, limit))


dry = scene()
out = record(dry)
output_pcm(out)
```